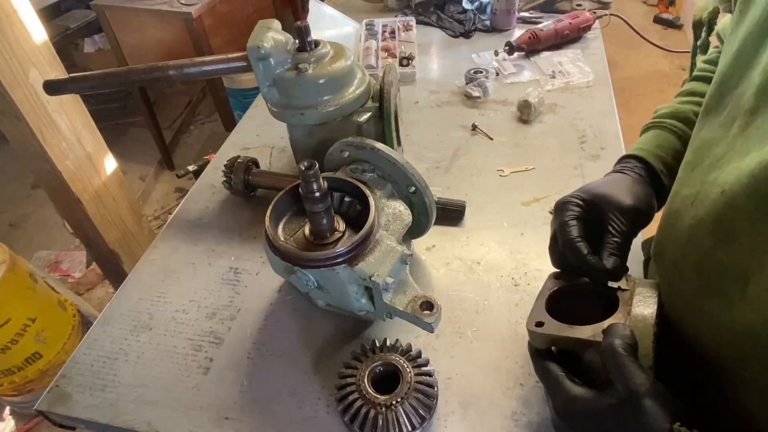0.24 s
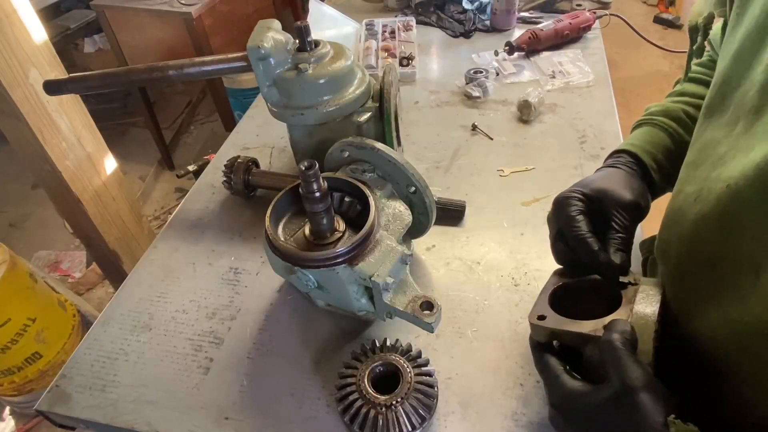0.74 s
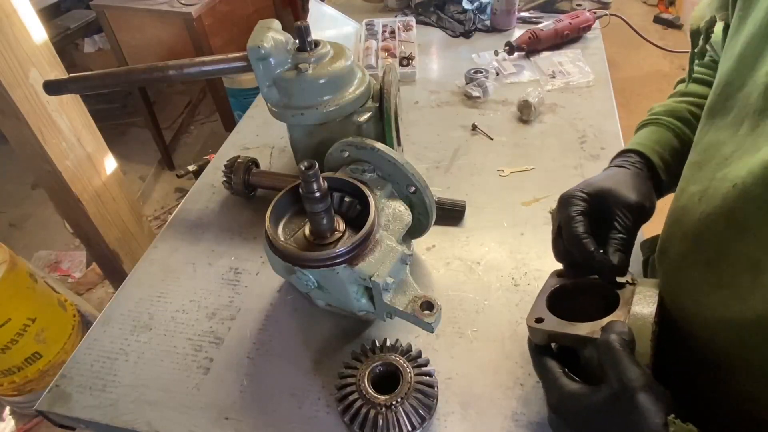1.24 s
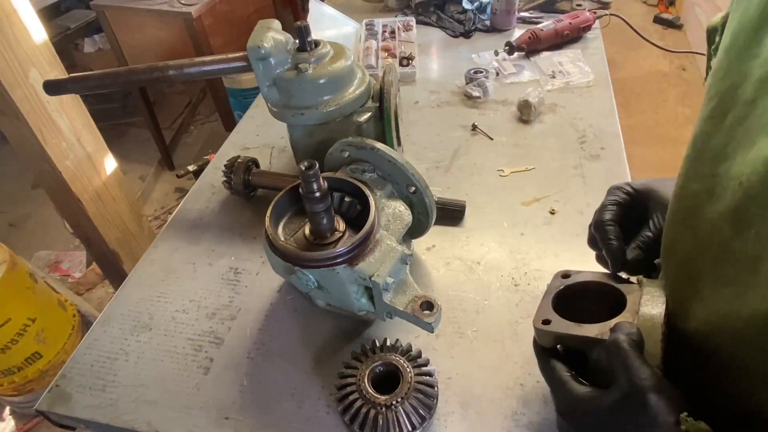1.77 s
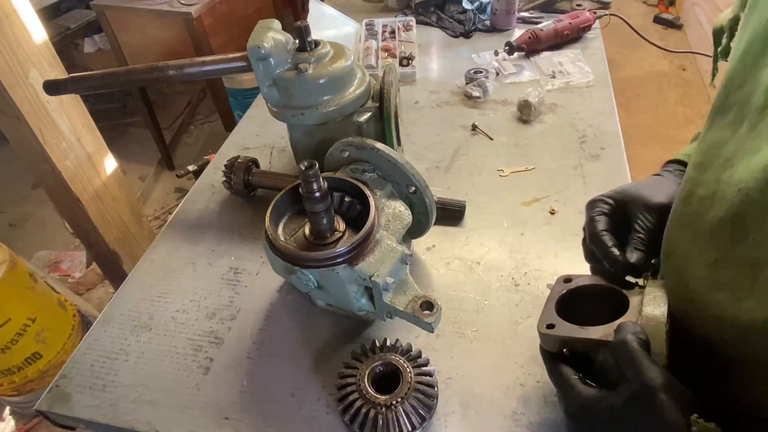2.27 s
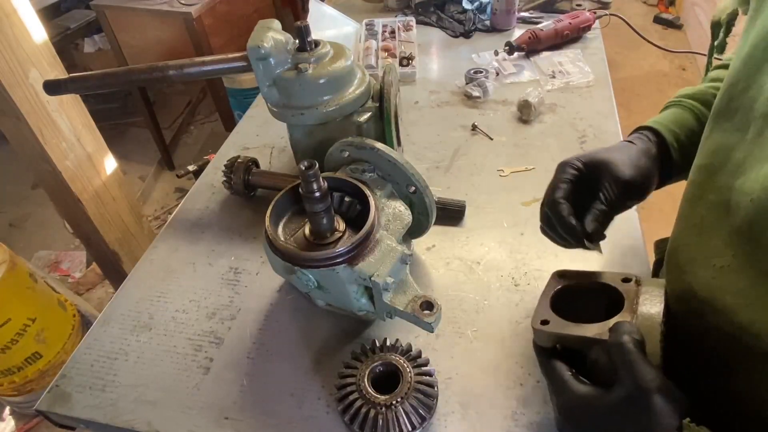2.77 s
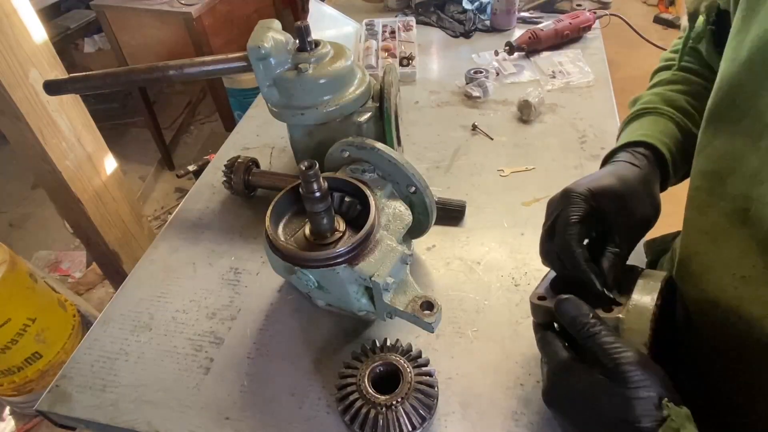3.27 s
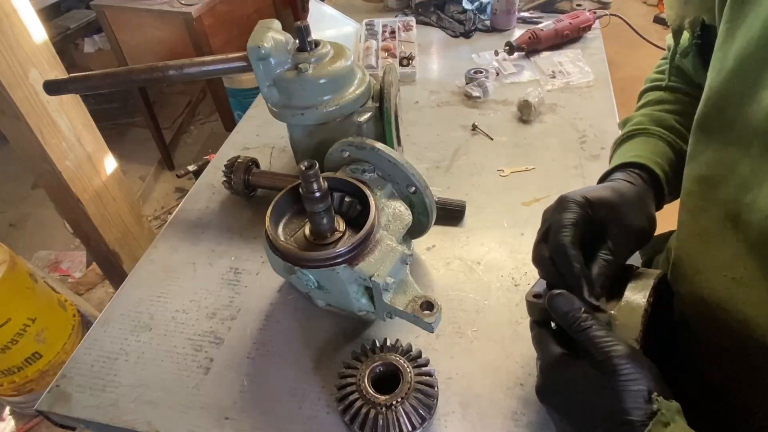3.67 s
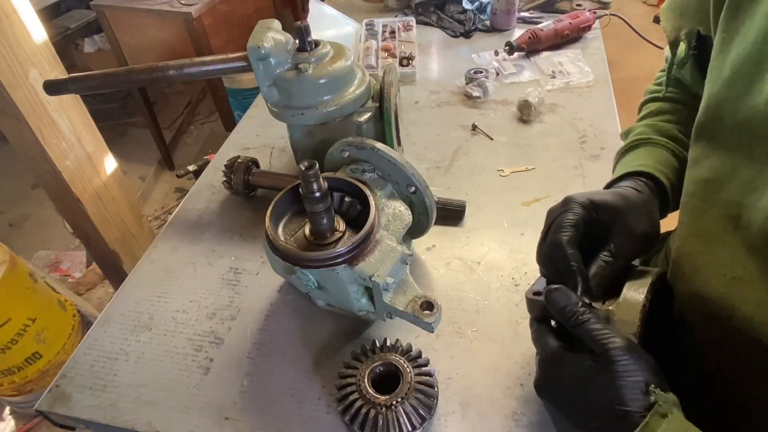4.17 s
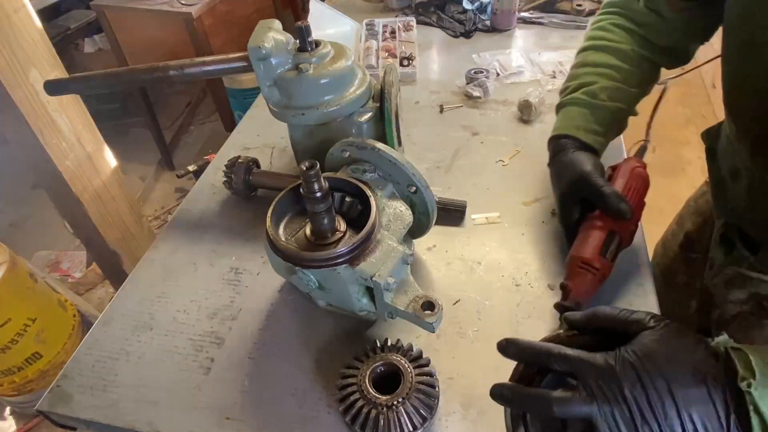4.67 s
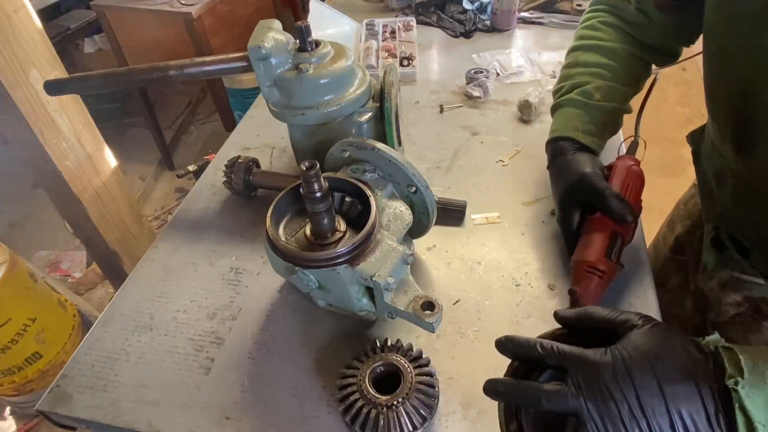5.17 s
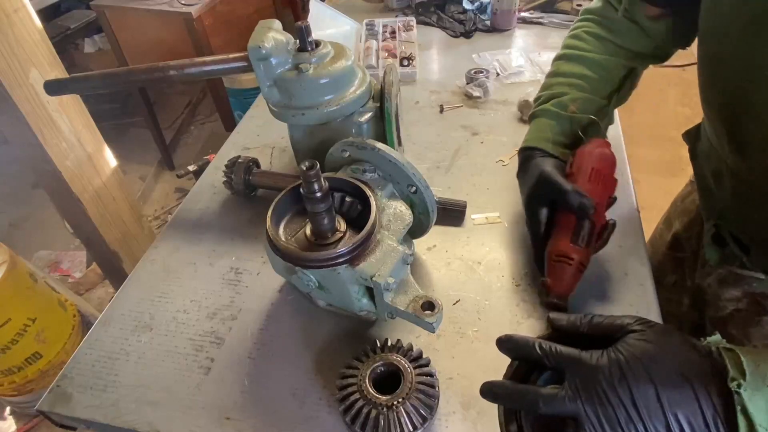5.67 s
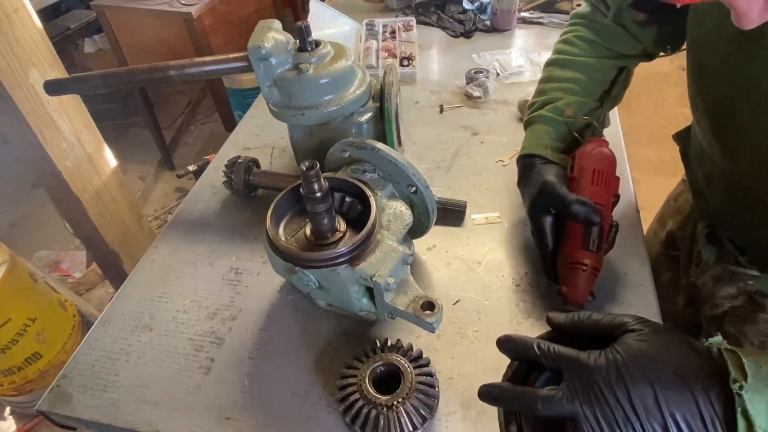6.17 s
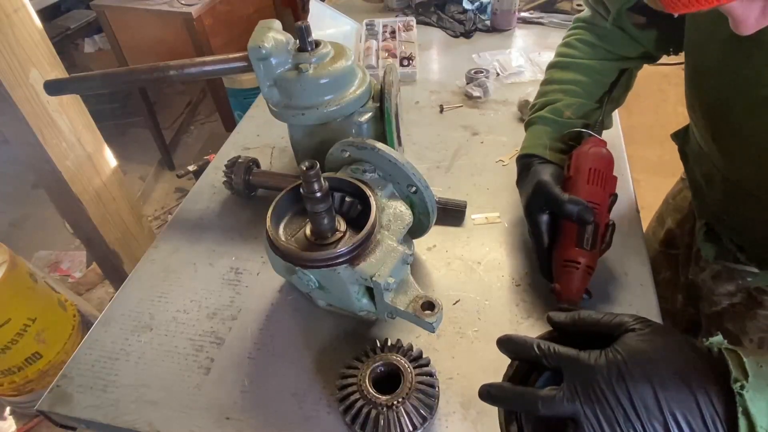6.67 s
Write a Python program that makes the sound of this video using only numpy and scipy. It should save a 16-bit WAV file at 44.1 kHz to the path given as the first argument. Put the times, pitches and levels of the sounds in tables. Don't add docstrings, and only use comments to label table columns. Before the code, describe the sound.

Dry, uneven metallic clicks and a bright flake snap come first, with soft rubbing of gloves and dull bench thuds. Then a brief rough drag, a double switch click and a rising electric whirr. The spinning bit taps, chatters harshly and clangs several times, then the tool settles into a buzzy, hissing high whine. Small workshop, heard close in stereo from beside the bench.

```python
import sys
import numpy as np
from scipy import signal
from scipy.fft import rfft, irfft, next_fast_len
from scipy.io import wavfile
from scipy.ndimage import uniform_filter1d

SR = 44100
rng = np.random.default_rng(int(sys.argv[2]) if len(sys.argv) > 2 else 0)


def makeup_ratio(level_db):
    decades = np.asarray(level_db, float) / 20
    return 10 ** decades


def persist_wave(psi):
    counts = np.round(np.clip(psi, -1, 1) * 32767).astype(np.int16)
    wavfile.write(sys.argv[1], SR, np.atleast_2d(counts).T)


N = 305172
MAINS_HZ = 120
FULL_HZ = 323


def evened(x):
    return x / np.sqrt(np.mean(x ** 2) + 1e-20)


def read(points, hz):
    f, value = np.transpose(points)
    return np.interp(np.log(hz + 1), np.log(f + 1), value)


def shape(points):
    return lambda hz: makeup_ratio(read(points, hz))


def played(rows):
    s, *columns = np.transpose(rows)
    t = np.arange(N) / SR
    inside = (t >= s[0]) & (t <= s[-1])
    gate = uniform_filter1d(1. * inside, size=200, mode="nearest")
    return [np.interp(t, s, c) for c in columns] + [gate]


def spells(rows):
    t = np.arange(N) / SR
    return sum(makeup_ratio(db - 20 * np.maximum((s - t) / rise_s, (t - s) / fall_s)) for s, db, rise_s, fall_s in rows)


def add(mix, s, sound):
    part = mix[round(s * SR):][:len(sound)]
    part += sound[:len(part)]


def colour(x, gain):
    size = next_fast_len(x.shape[-1] + 4096)
    return irfft(rfft(x, size) * gain(np.fft.rfftfreq(size, 1 / SR)), size)[..., :x.shape[-1]]


def drift(hz):
    size = int(SR / 50 / hz) + 1
    coarse = rng.standard_normal(N // 50 + 2)
    coarse = uniform_filter1d(uniform_filter1d(coarse, size), size)
    return evened(np.interp(np.arange(N) / 50, np.arange(len(coarse)), coarse))


def grit(points, grain_db, per_s):
    grains = makeup_ratio(grain_db * np.minimum(rng.exponential(1, N), 5)) * (rng.random(N) < per_s / SR)
    swell = 1 + uniform_filter1d(grains, size=12) * 12
    return evened(colour(rng.standard_normal(N) * swell, shape(points)))


def ring(modes, t):
    return sum(makeup_ratio(db - 60 * t / t60) * np.sin(2 * np.pi * hz * t) for hz, db, t60 in modes)


def air():
    # (frequency [Hz], level [dB per Hz])
    hum = [(12, -38), (20, -20), (48, 5), (71, 7.5), (94, -5), (133, -25), (185, -23), (293, -24),
           (344, -33), (678, -34), (7360, -40), (10500, -46), (13000, -53)]
    # (frequency [Hz], level [dB])
    scatter = [(100, -15), (400, -9), (1200, -.5), (16000, -.5)]
    near, left, right = (grit(hum, grain_db=0, per_s=1) for _ in range(3))
    apart = colour(np.array([left, right]), shape(scatter))
    shared = colour(near, lambda hz: np.sqrt(1 - shape(scatter)(hz) ** 2))
    return makeup_ratio(-63 + 1.16 * drift(hz=7.9)) * (shared + apart)


def click(front, db, hz, snap_db, thud_db, ring_db):
    # (frequency [Hz], level [dB])
    crack_colour = [(200, -15), (500, 3), (800, 0), (1300, -6), (2400, -3), (3200, -4), (4800, -5.5),
                    (7000, -14), (11000, -27)]
    # (frequency [Hz], level [dB])
    thud_colour = [(60, -8), (200, 3), (450, -2), (900, -15.5), (1500, -39.5)]
    t = np.arange(5000) / SR
    chance = rng.standard_normal((2, len(t)))
    crunch = 0.093 * np.exp(-t / 0.0028) + 0.016 * np.exp(-t / 0.082)
    edge = chance[0] * (front * np.exp(-t / 0.0009) + crunch)
    crack = colour(edge, shape(crack_colour))
    snap = signal.lfilter(*signal.butter(1, [3800, 9500], "band", fs=SR), edge)
    modes = [(hz, 0, .015), (.79 * hz, -12, .012), (1.005 * hz, -20, .05)]
    rung = signal.oaconvolve(edge, ring(modes, t))[:len(t)]
    thud = colour(chance[1] * t / .004 * np.exp(-t / 0.015), shape(thud_colour))
    thud = thud * (1 - np.exp(-t / 0.00093))
    parts = ((crack, -3.5), (snap, snap_db), (thud, thud_db - 5.0), (rung, ring_db))
    return makeup_ratio(db) * sum(x / abs(x).max() * makeup_ratio(d) for x, d in parts)


def clicks(rows, front, snap_db, ring_db):
    out = np.zeros(N)
    for s, db, hz, thud_db in rows:
        add(out, s, click(front, db, hz, snap_db, thud_db, ring_db))
    return out


def blade():
    # (time [s], level [dB], ring [Hz], thud [dB])
    picks = [(0.1514, -65, 2970, -5), (0.2294, -36.5, 3020, -5), (0.2367, -39.5, 2920, -14),
             (0.3037, -31.5, 2900, -10.5), (0.3742, -55, 2990, -13), (0.387, -53, 2310, 2),
             (0.4447, -65, 2090, -4), (0.6319, -30.5, 2900, -7), (0.6441, -35, 2970, -31),
             (0.7596, -36, 2990, -8.5), (1.0502, -68, 2280, 2), (1.9834, -35, 2415, 0.5),
             (1.9954, -35.5, 3130, -10)]
    slips = [
        (0.613, -70, 2950, -20),
        (0.74, -69, 2950, -10),
    ]
    snaps = [
        (1.2494, -76, 2300, -4),
        (1.9783, -25, 2360, -19),
        (2.9643, -47.5, 1940, 4),
        (2.9906, -43.5, 3730, -22),
        (3.014, -49, 2230, 5),
        (3.0977, -47, 2470, -3),
        (3.4933, -48.5, 3180, -12),
        (3.6703, -36, 3300, -19),
    ]
    ticks = [(1.8641, -49, 2410, 2.5), (3.1541, -58.5, 2560, -6), (3.3405, -44, 3310, -8.5),
             (3.6535, -40.5, 3180, -10)]
    nudges = [(4.292, -51, 3160, -3), (4.388, -63, 3000, 0), (4.4245, -53, 2820, 7), (4.481, -52, 2920, -8)]
    out = clicks(picks, front=0.89, snap_db=-17, ring_db=-2.5)
    out += clicks(slips, front=.1, snap_db=-20, ring_db=14)
    out += clicks(snaps, front=0.94, snap_db=-4.5, ring_db=-10)
    out += clicks(ticks, front=1, snap_db=2.2, ring_db=2.5)
    return out + clicks(nudges, front=1, snap_db=4, ring_db=2.5)


def shifting():
    # (time [s], level [dB], rise [s per 20 dB], fall [s per 20 dB])
    moves = [(0.38, -71, .15, .3), (0.9, -82, .6, 1.4), (1.78, -78, .5, .4), (2.0, -68.5, 0.35, 0.1),
             (2.4, -70, 0.45, 1.5), (2.6, -62.5, .4, 0.4), (2.742, -44, .015, 0.4455),
             (2.88, -50.5, 0.13, 0.39), (3.4, -71.5, 0.5, 3.5), (4.39, -59, .05, 0.25),
             (4.59, -64, 0.056, 0.64), (6.88, -60, .15, .5)]
    # (frequency [Hz], level [dB per Hz])
    grind_colour = [(18, -47), (30, -15), (91, -2), (185, -14.5), (236, -12.5), (344, -19.5), (420, -21),
                    (853, -31.5), (1190, -36.5), (6000, -56), (7800, -84.5), (13200, -120)]
    return spells(moves) * makeup_ratio(4.5 + 0.97 * drift(hz=14)) * grit(grind_colour, grain_db=2.5, per_s=500)


def gloves():
    # (time [s], level [dB], rise [s per 20 dB], fall [s per 20 dB])
    fabric_rubs = [(1.16, -83, .09, .04), (1.29, -82, .08, .025), (1.49, -81.5, .04, 0.065),
                   (1.564, -85, .09, .055), (1.794, -82.5, .15, .045), (1.85, -78, .021, .015),
                   (2.05, -80, .015, .06), (2.136, -71, .021, 0.046), (2.17, -76.5, .1, 0.97),
                   (2.328, -69, 0.023, 0.013), (2.622, -76.5, 0.047, .055), (2.748, -87, .025, 0.27),
                   (2.854, -62, .01, 0.017), (2.892, -67, .007, .055), (2.962, -64.5, 0.027, .055),
                   (3.268, -66, .11, 0.12), (3.37, -87, .015, 0.087), (3.446, -78, 0.1, .045),
                   (3.508, -69.5, 0.055, 0.13), (3.64, -76, .1, .015), (3.71, -75, .015, .075),
                   (3.86, -76.5, .22, 0.2), (4.068, -81, 0.033, 0.08), (4.218, -74, 0.12, .06)]
    # (frequency [Hz], level [dB per Hz])
    rustle_colour = [(470, -46), (800, 3.5), (1130, -7), (1710, -9.5), (2110, -12), (2380, -3),
                     (3750, -11.5), (7360, -13.5), (10800, -10), (15000, -26)]
    return makeup_ratio(1.0) * spells(fabric_rubs) * grit(rustle_colour, grain_db=3.5, per_s=150)


def knocks():
    # (time [s], level [dB], share of free ring left [0-1])
    hits = [(1.987, -45.5, 0.81), (2.736, -46.5, 0.65), (2.849, -37.5, 0.62), (4.295, -59.5, 0.42),
            (4.367, -32.5, 0.2), (4.439, -56, 0.4), (5.034, -27, 0.69), (5.261, -32, 0.86),
            (5.434, -26.5, 0.36), (5.588, -38.5, 0.91), (5.809, -26.5, 1)]
    # (frequency [Hz], level [dB], t60 [s])
    bench = [(87.8, -5, 0.34), (239.4, 3.5, 0.42), (316, -21, 0.06), (441, -9, 0.22), (685, -4, 0.21)]
    out, t = np.zeros(N), np.arange(SR // 2) / SR
    onset = 1 - np.exp(-t / 0.0041)
    for s, db, free in hits:
        damped = [(hz, d, free * t60) for hz, d, t60 in bench]
        add(out, s, makeup_ratio(db - 6.0) * ring(damped, t) * onset)
    return out


def flicks():
    # (time [s], level [dB], ring [Hz], thud [dB])
    flips = [
        (2.357, -22.5, 5890, -49.5),
        (2.3789, -29, 6400, -39.5),
        (4.8179, -30, 6880, -20),
        (4.8265, -35.5, 5000, -10),
    ]
    return clicks(flips, front=0.91, snap_db=1.5, ring_db=-5.5)


def scrape():
    # (time [s], level [dB])
    slide = [(3.05, -84), (3.178, -94), (3.292, -79), (3.53, -78), (3.76, -78), (3.902, -80.5), (4.0, -89)]
    # (frequency [Hz], width [Hz], level [dB])
    flange = [(2220, 220, 2), (3180, 140, -9), (5200, 560, -3.5)]
    slide_db, sliding = played(slide)
    song = lambda hz: sum(makeup_ratio(db) / (1 + (2 * (hz - f) / width) ** 2) for f, width, db in flange)
    rubbed = evened(colour(rng.standard_normal(N), song))
    return sliding * makeup_ratio(slide_db - 1.0 + 2.9 * drift(hz=25)) * rubbed


def drag():
    # (time [s], level [dB])
    pull = [
        (4.53, -91),
        (4.545, -52),
        (4.572, -31),
        (4.65, -31.5),
        (4.756, -58.5),
        (4.812, -54.5),
        (4.818, -63),
        (4.83, -44),
    ]
    # (frequency [Hz], level [dB per Hz])
    drag_colour = [(88, -52), (150, -23.5), (217, 0), (264, -19), (466, -3.5), (888, -12), (1020, -4.5),
                   (2650, -11), (11300, -27.5), (14800, -39), (16000, -59.5)]
    pull_db, pulling = played(pull)
    return pulling * makeup_ratio(pull_db + 0.4) * grit(drag_colour, grain_db=3.0, per_s=700)


def taps():
    # (time [s], level [dB], ring [Hz], thud [dB])
    touches = [
        (4.642, -36.5, 6000, -5),
        (5.027, -22, 3960, -12),
        (5.2619, -22, 2070, -3),
        (5.4307, -33, 6900, 1),
        (5.5811, -33, 2300, -10),
    ]
    return clicks(touches, front=0.32, snap_db=0, ring_db=-1.6)


def through(hz, centre_hz, width_hz, top_db):
    return top_db - 20 * np.log10(1 + (2 * (hz - centre_hz) / width_hz) ** 2)


def fan(turn, mains, speed):
    # (frequency [Hz], level [dB per Hz])
    fan_colour = [(1500, -22), (2900, 0.9), (3750, 2.5), (5000, -3.5), (6750, -0.5), (8300, -5),
                  (9100, 0.5), (11200, -4), (12500, -4), (13500, -18.5), (14300, -14.5), (15000, -20),
                  (15300, -45), (15600, -60), (15900, -60)]
    hiss = grit(fan_colour, grain_db=0.0, per_s=690) * (1 + 0.059 * np.cos(turn) + 0.027 * mains)
    return hiss, makeup_ratio(-34.5 + 15.5 * np.log10(speed / FULL_HZ))


def shell_buzz(turn, mains, speed):
    # (frequency [Hz], level [dB per Hz])
    buzz_colour = [(120, -30.5), (400, -10), (800, -5.5), (1100, 0.5), (1550, 0.5), (2000, 6), (2500, 4.5),
                   (2900, -10), (4000, -21.5)]
    buzz = grit(buzz_colour, grain_db=0.0, per_s=30) * (1 + .3 * np.cos(turn) + .3 * mains)
    buzz = buzz * makeup_ratio(1.2 * drift(hz=25))
    return buzz, makeup_ratio(-34.5 + 24.5 * np.log10(speed / FULL_HZ))


def shaft_tones(turn, speed, low_db, shell):
    # (time [s], at the turns [dB], at twice the turns [dB])
    grip = [(5.32, -56, -60), (5.46, -42, -58), (5.73, -54, -60), (5.92, -41, -48), (6.06, -44, -55),
            (6.115, -58, -58), (6.17, -47, -47), (6.27, -43, -41), (6.31, -57, -50), (6.37, -56, -50),
            (6.43, -49, -47), (6.52, -52, -51), (6.58, -41, -51), (6.7, -41, -41), (6.775, -43, -38),
            (6.815, -41, -52), (6.92, -41, -45)]
    # (multiple of the turns [-], level at full speed [dB])
    unbalance = [(3, -44), (3.42, -41), (4, -50), (4.92, -54), (5, -49), (6, -44), (7, -43), (10.0, -47)]
    # (multiple of the turns [-], level at full speed [dB])
    bars = [(15, -55), (16, -51), (18, -53), (19, -56), (20.0, -53), (21, -56), (25, -57), (26, -53),
            (27, -51), (38, -59), (48, -49)]
    decades = np.log10(speed / FULL_HZ)
    s, first_db, second_db = np.transpose(grip)
    t = np.arange(N) / SR
    first = makeup_ratio(np.interp(t, s, first_db)) * np.cos(turn)
    second = makeup_ratio(np.interp(t, s, second_db)) * np.cos(2 * turn)
    out = makeup_ratio(low_db) * (first + second)
    lines = [(5, through(5 * speed, centre_hz=1525, width_hz=100, top_db=-37)),
             (16, through(16 * speed, centre_hz=3700, width_hz=2800, top_db=-38)),
             (32, through(32 * speed, centre_hz=9500, width_hz=1400, top_db=-44)),
             (16, through(16 * speed, *shell) - 3)]
    lines += [(k, 110 * decades + db) for k, db in unbalance]
    lines += [(k, 45 * decades + db) for k, db in bars]
    for k, db in lines:
        wander = (.1 + .1 * np.sqrt(k)) * drift(hz=30)
        out += makeup_ratio(db + 2.2 * drift(hz=12)) * np.cos(k * turn + wander)
    return out


def slot_tones(turn, speed, low_db, shell):
    # (multiple of the mains beat off the slot tone [-], level [dB])
    sides = [(-2, -12), (-1, -1), (0, -1), (1, 0.1), (2, -3), (3, -9)]
    # (time [s], level [dB])
    palm = [(5.5, 0), (5.8, 0), (5.95, 2), (6.1, 0.5), (6.4, -2), (6.6, 0), (6.72, 0), (6.8, -5),
            (6.92, -6)]
    t = np.arange(N) / SR
    palm_db = np.interp(t, *np.transpose(palm))
    out = np.zeros(N)
    for side, db in sides:
        slot_db = through(8 * speed + side * MAINS_HZ, *shell) + palm_db
        phase = 8 * turn + side * 2 * np.pi * MAINS_HZ * t + .12 * drift(hz=40)
        out += makeup_ratio(slot_db + low_db + db + 5.5 + 1.4 * drift(hz=30)) * np.cos(phase)
    return out


def tool():
    # (time [s], shaft turns [Hz])
    spin = [(4.82, 61), (5.05, 134.6), (5.2, 183.1), (5.25, 195.5), (5.32, 197.9), (5.46, 221),
            (5.55, 246.7), (5.73, 285.4), (5.81, 297.3), (5.87, 294), (6.2, 314), (6.33, 319.4),
            (6.45, 320), (6.6, 322.5), (6.7, 322.2), (6.82, 326.2), (6.92, 325.2)]
    # (time [s], buzz [dB], rise [s per 20 dB], fall [s per 20 dB])
    rubs = [
        (5.04, -38, 0.3, 0.3),
        (5.27, -33, 0.025, 0.13),
        (5.44, -44, .05, .1),
        (5.585, -39, 0.015, .05),
        (5.632, -35, .01, 0.46),
    ]
    # (frequency [Hz], width [Hz], level at the top [dB])
    shell = (2490, 150, -30)
    t = np.arange(N) / SR
    speed = np.interp(t, *np.transpose(spin))
    on = np.clip((t - 4.82) / .07, 0, 1)
    turn = 2 * np.pi * np.cumsum(speed) / SR
    mains = np.cos(2 * np.pi * MAINS_HZ * t)
    load = spells(rubs)
    hiss, hiss_gain = fan(turn, mains, speed)
    buzz, buzz_gain = shell_buzz(turn, mains, speed)
    noise = (hiss_gain + makeup_ratio(-7) * load) * hiss + (buzz_gain + load) * buzz
    low_db = 20 * np.log10(np.clip((speed - 200) / 20, 1e-3, 1)) - 1
    lines = shaft_tones(turn, speed, low_db, shell) + slot_tones(turn, speed, low_db, shell)
    return on * noise, on * lines


def chatter():
    # (time [s], peak [dB])
    skips = [(5.0187, -25), (5.0216, -26), (5.0289, -17), (5.0356, -23), (5.0387, -26), (5.2391, -27),
             (5.2444, -32), (5.2499, -27), (5.2547, -20), (5.2612, -11), (5.2657, -13), (5.2722, -21),
             (5.2757, -16), (5.2802, -21), (5.2867, -18), (5.2912, -17), (5.2967, -17), (5.3018, -19),
             (5.3063, -19), (5.3121, -23), (5.3172, -20), (5.3219, -21), (5.3276, -18), (5.3316, -22),
             (5.3367, -24), (5.3414, -23), (5.3459, -28)]
    # (frequency [Hz], level [dB], t60 [s])
    bite_modes = [(560, -13, .03), (800, -15, .02), (1300, -13, .01), (1780, -6, .011), (2050, 0, .014),
                  (2400, -4, .011)]
    out, t = np.zeros(N), np.arange(1500) / SR
    onset = 1 - np.exp(-(t / .0009) ** 2)
    bends = rng.uniform(.95, 1.05, (len(skips), len(bite_modes)))
    for (s, db), bend in zip(skips, bends):
        modes = [(b * hz, d, t60) for b, (hz, d, t60) in zip(bend, bite_modes)]
        add(out, s - .0013, makeup_ratio(db + 3.0) * ring(modes, t) * onset)
    return out


def strikes():
    # (time [s], level [dB], ring [Hz], thud [dB])
    hard_hits = [(5.4935, -16, 5300, -19), (5.5815, -23, 5600, -15), (5.6295, -16, 6200, -15),
                 (5.656, -21, 6300, -30)]
    # (frequency [Hz], level [dB], t60 [s])
    flank = [(1500, -3, .012), (2400, -7, .01), (4870, -6, .06), (5300, -3, .012), (7000, -7, .008)]
    out, t = clicks(hard_hits, front=1, snap_db=-7, ring_db=-3), np.arange(SR // 2) / SR
    for s, db, *_ in hard_hits:
        add(out, s, makeup_ratio(db - 1.5) * ring(flank, t))
    return out


def room(x):
    # (frequency [Hz], t60 [s])
    decay = [(120, 1), (330, 0.31), (870, 0.18), (2300, 0.13), (6060, 0.078)]
    # (frequency [Hz], level [dB])
    wet = [(100, -24), (250, -18), (400, -8), (800, -3), (2200, -9), (3200, -4), (4950, 0), (8000, -2.5),
           (10000, -8), (11500, -20.5), (16000, -22)]
    echoes = np.zeros((2, SR // 2))
    at = np.arange(120, SR // 2 - 20, 20) + rng.integers(0, 20, (2, (SR // 2 - 121) // 20))
    np.put_along_axis(echoes, at, rng.choice([-1., 1.], at.shape), 1)
    hz, t, z = signal.stft(echoes, SR, nperseg=256)
    t60 = read(decay, hz)[:, None]
    tail = signal.istft(z * makeup_ratio(-60 * t / t60) / np.sqrt(t60), SR, nperseg=256)[1]
    tail = tail / np.linalg.norm(tail[0])
    return signal.fftconvolve(colour(x, shape(wet))[None], tail, axes=1)[:, :N]


def ports(x):
    # (frequency [Hz], phase [rad])
    lead = [(240, -.1), (330, -1.0), (850, -2.6), (1300, -1.2), (2200, -.8), (4000, -1.4), (5000, -3.2),
            (6400, -5.8), (7700, -5.2), (8900, -9.4), (10300, -12.1), (11700, -12.7), (12800, -15.6),
            (13900, -15.9), (14600, -18.8)]
    # (frequency [Hz], level [dB])
    tilt = [(60, -.8), (180, -2.5), (550, -.5), (1650, -1.5), (2500, -2.5), (4970, 2.5), (9000, -1),
            (15000, 0)]
    half = lambda hz: makeup_ratio(read(tilt, hz) / 2) * np.exp(.5j * read(lead, hz))
    return colour(x, lambda hz: np.array([half(hz), 1 / half(hz)]))


def scene():
    handled = blade() + shifting() + gloves() + knocks() + flicks() + scrape() + drag()
    handled = handled + taps() + chatter() + strikes()
    noise, lines = tool()
    whirr = ports(noise + lines) + makeup_ratio(3.5) * room(noise + .4 * lines)
    return air() + makeup_ratio(1.0) * ports(handled) + makeup_ratio(2.0) * room(handled) + whirr


def top_cut(x):
    return signal.sosfilt(signal.butter(12, 16510, fs=SR, output="sos"), x)


def record(dry):
    limited = signal.oaconvolve(dry, signal.firwin(255, 15800, fs=SR)[None], "same")
    return top_cut(limited)


dry = scene()
out = record(dry)
persist_wave(out)
```